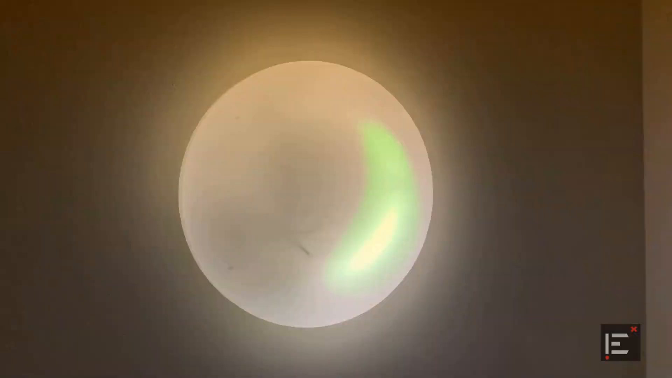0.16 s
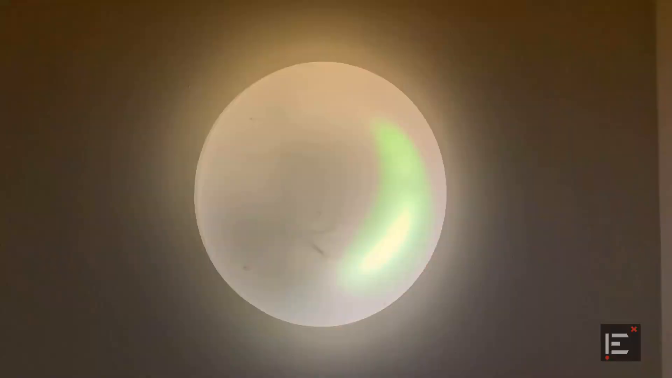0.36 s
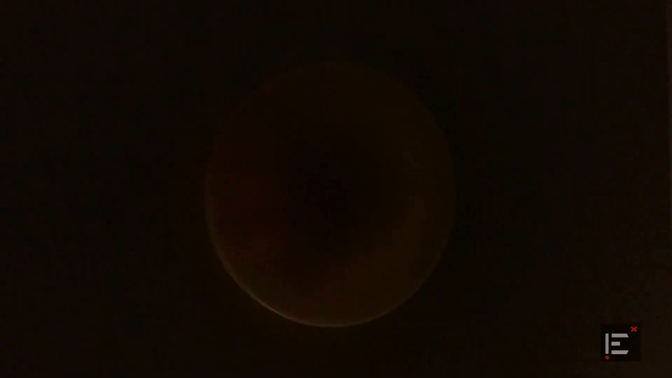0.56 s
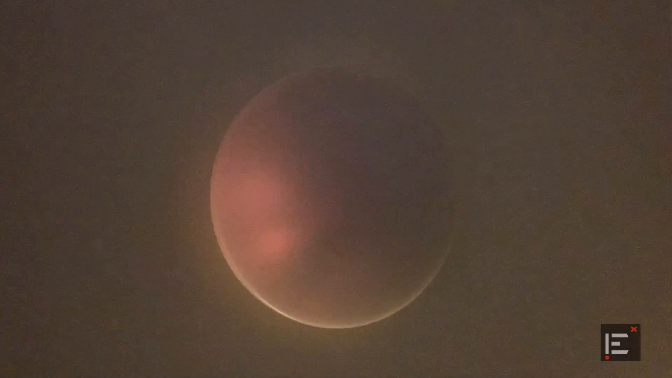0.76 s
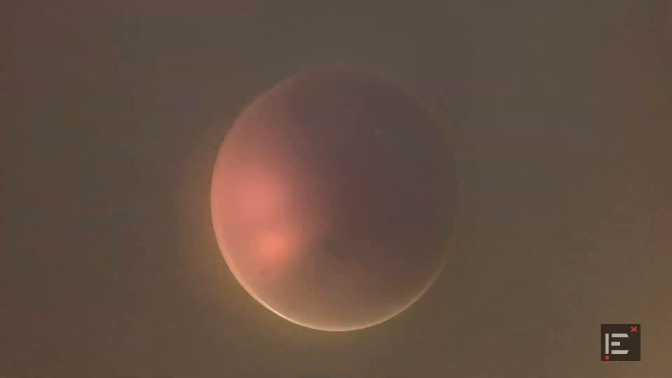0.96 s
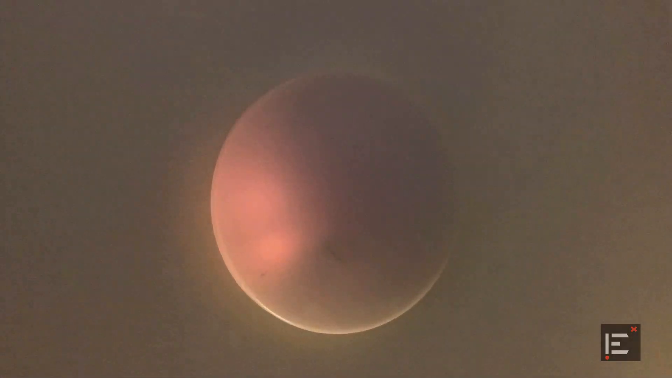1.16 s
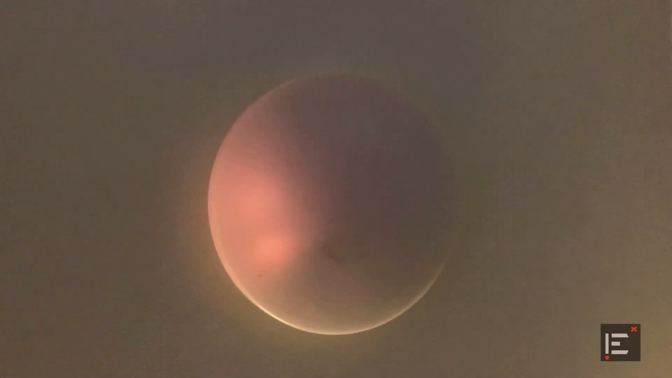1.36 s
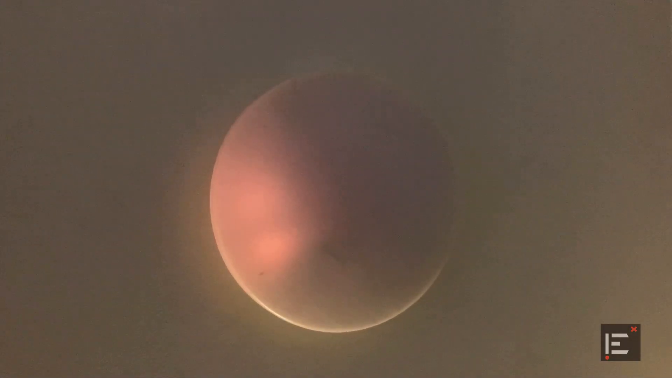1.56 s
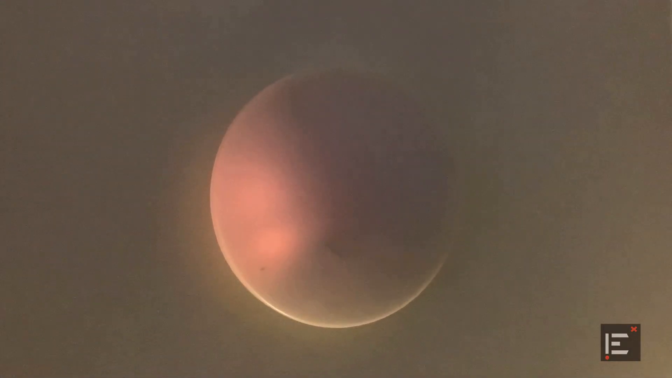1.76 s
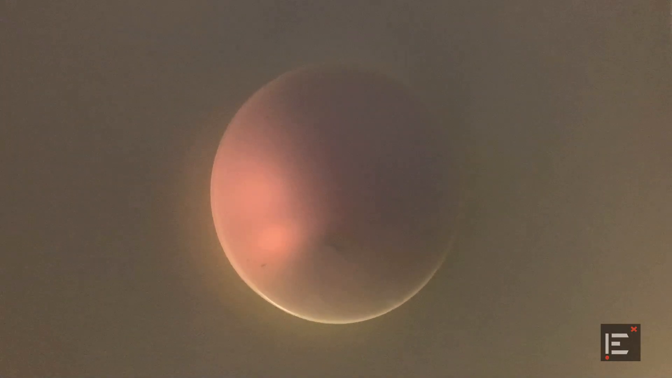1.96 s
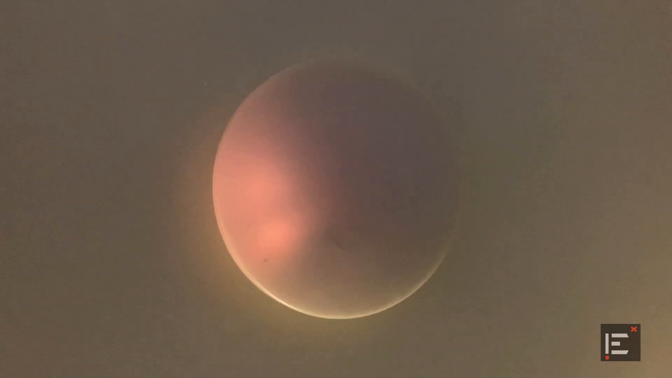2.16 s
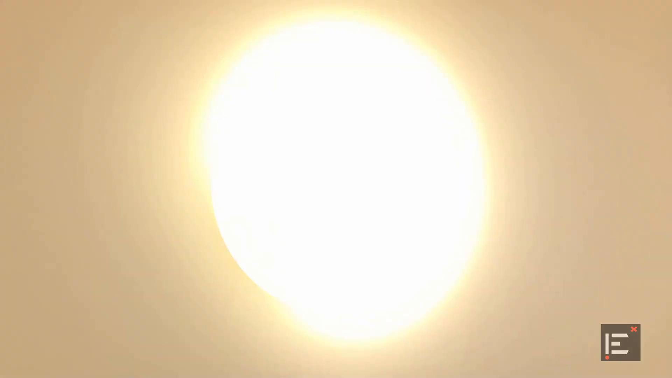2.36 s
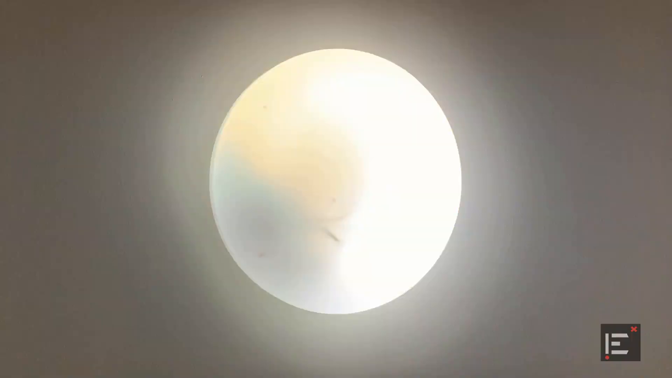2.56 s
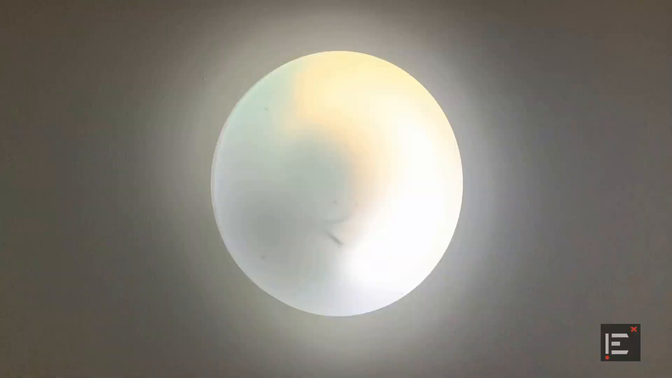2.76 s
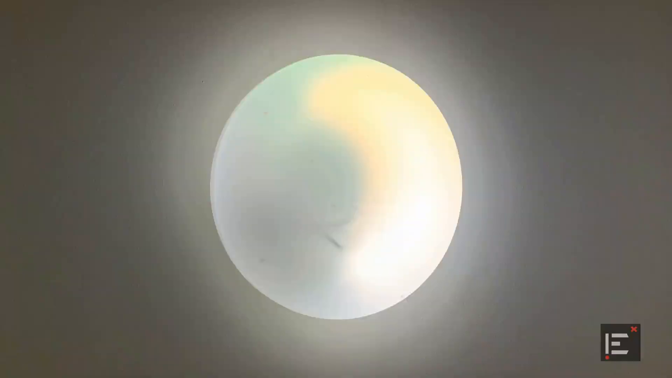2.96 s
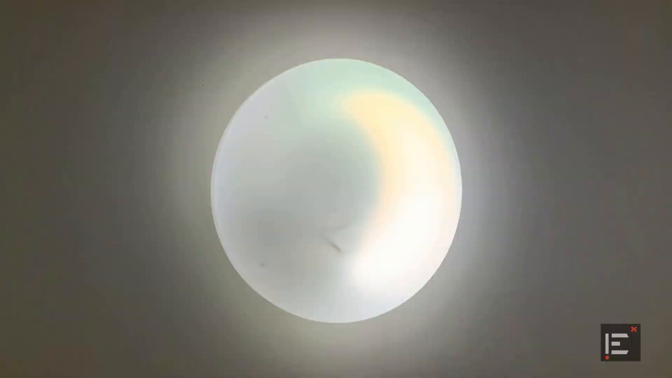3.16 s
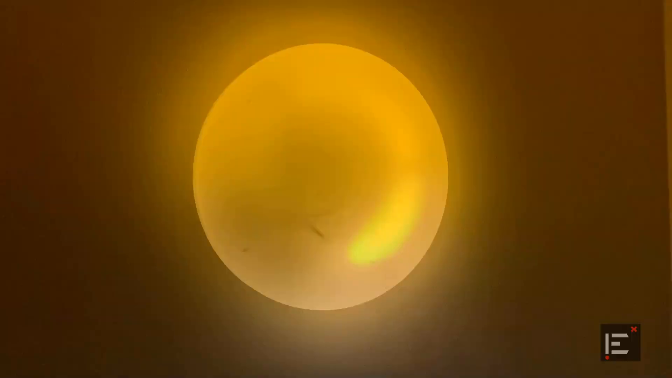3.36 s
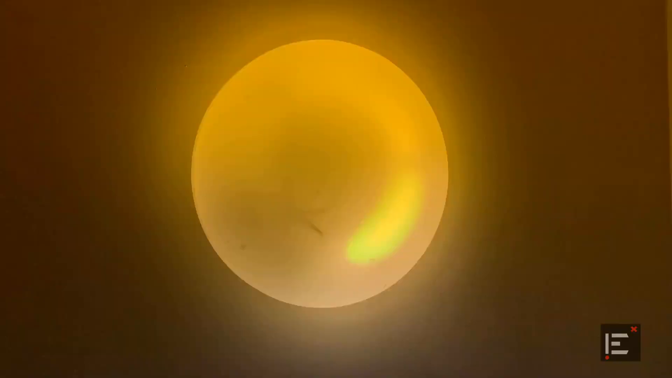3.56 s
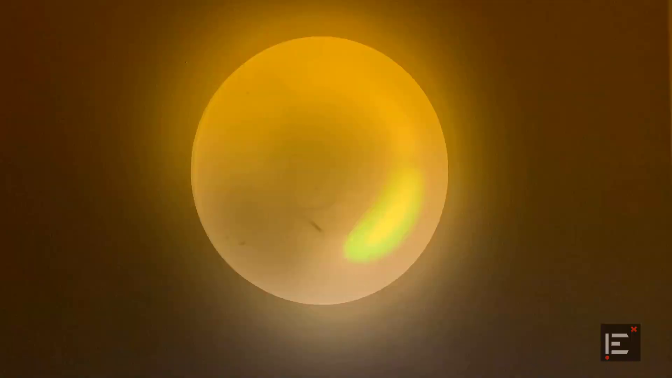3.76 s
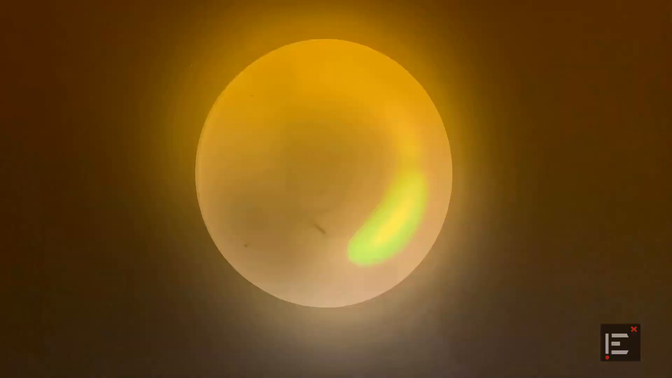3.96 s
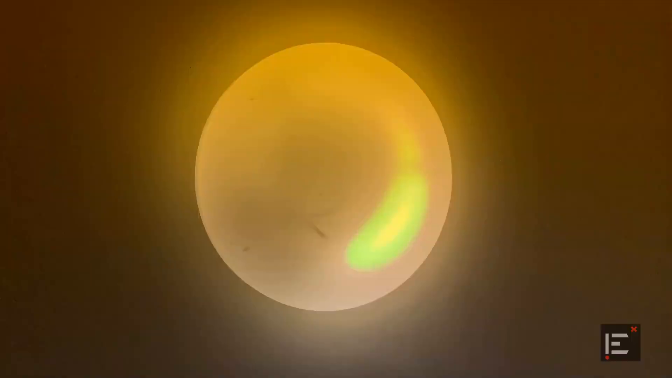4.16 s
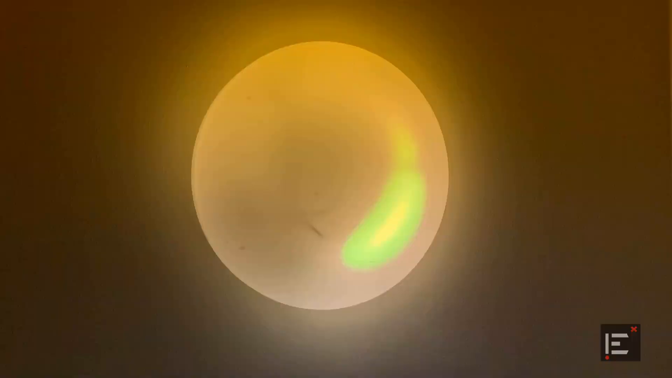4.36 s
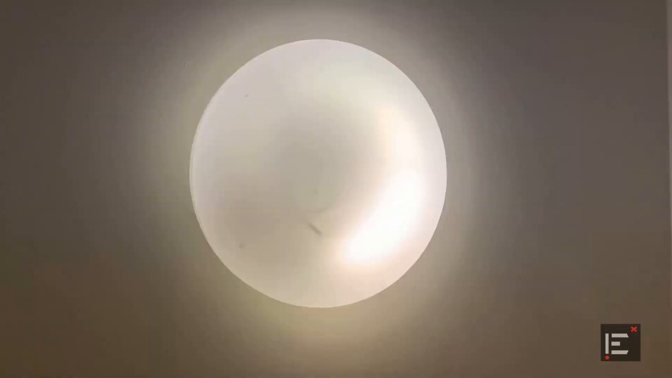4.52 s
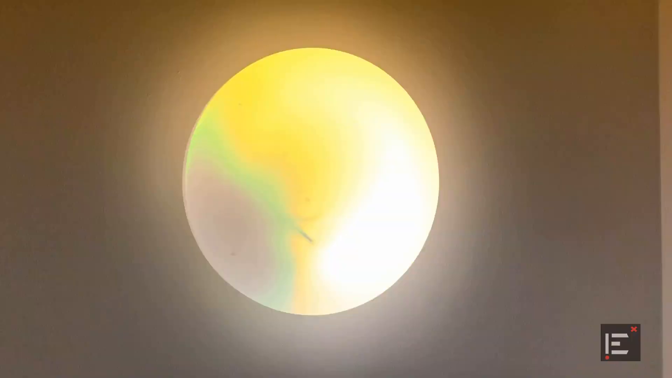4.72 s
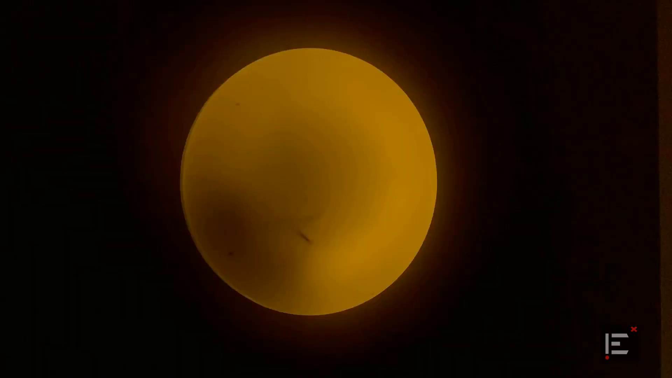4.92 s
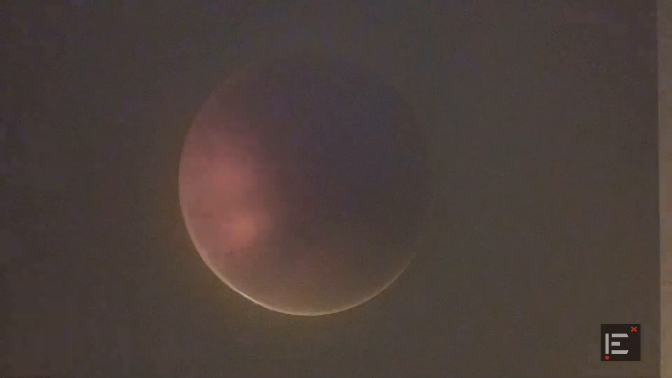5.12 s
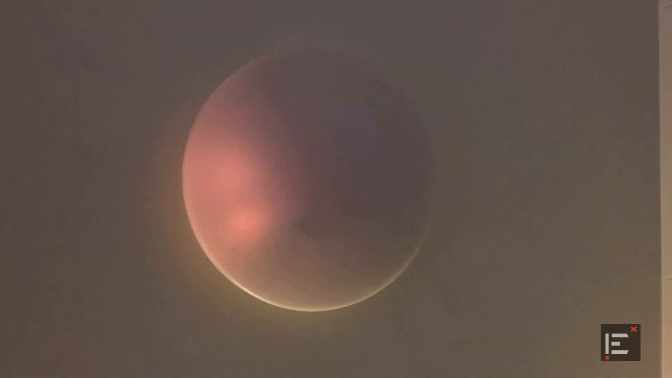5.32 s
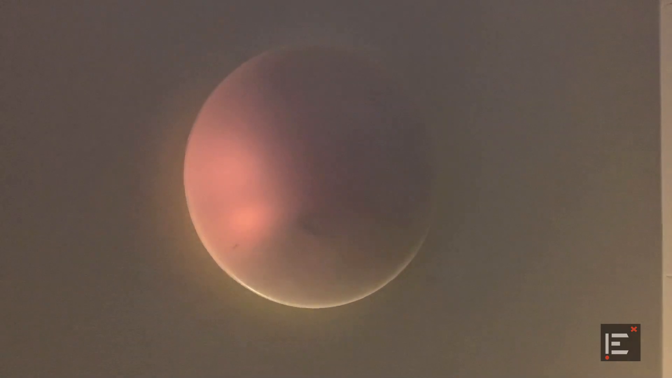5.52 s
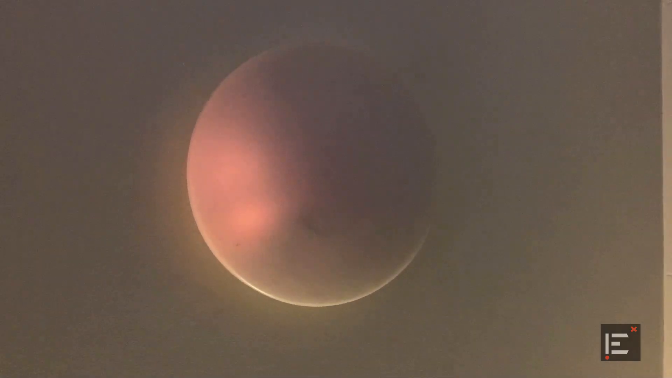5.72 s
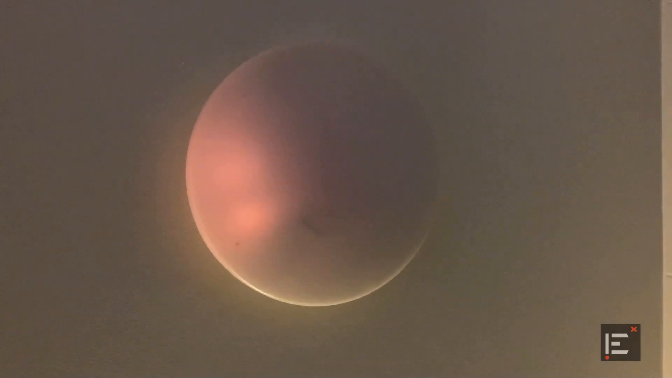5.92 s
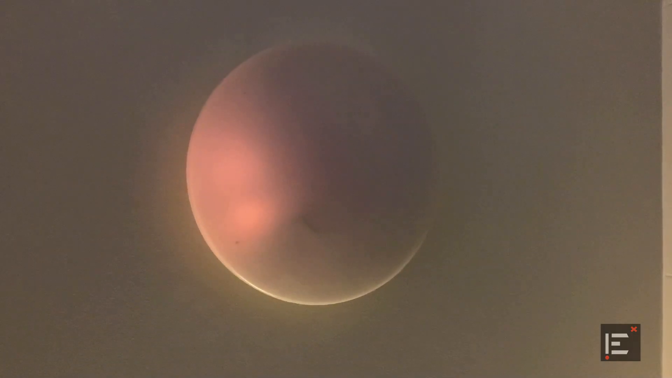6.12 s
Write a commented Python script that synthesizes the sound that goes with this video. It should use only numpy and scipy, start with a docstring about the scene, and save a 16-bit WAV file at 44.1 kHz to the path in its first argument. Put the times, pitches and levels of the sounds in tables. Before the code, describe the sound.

Close electrical mains buzz with a raspy fixture rattle switches instantly between loud and soft, five sudden changes, ending on the quiet hum.

```python
"""Close beside a failing fluorescent lamp, whose choke hums on multiples of the mains and rattles the fixture.
It starts loud with the tube lit, then jumps five times between this and a soft hum while only the ends glow.
After each jump the level settles within hundredths of a second, and the fine grain repeats at a fixed interval.
The hum sums partials that knock twice a mains cycle, over noise that throbs with them. When loud, patches of hum
and hiss swell and sink at random, mostly in the kilohertz range; when soft only the hiss's do, and each round dips briefly."""
import sys
import numpy as np
from scipy import signal
from scipy.fft import rfft, irfft
from scipy.io import wavfile
from scipy.ndimage import uniform_filter1d

SR = 44100
rng = np.random.default_rng(int(sys.argv[2]) if len(sys.argv) > 2 else 0)


def master_out(mix):
    """Clip the mix to full scale and print it as 16-bit PCM to the path in sys.argv[1]."""
    frames = np.transpose(np.atleast_2d(mix))
    ceiling = np.clip(frames, -1, 1)
    pcm = np.round(ceiling * 32767).astype(np.int16)
    wavfile.write(sys.argv[1], SR, pcm)


N = 277116

MAINS_HZ = 60
EDGE_HZ = 15640  # upper band edge of the sound
LIT, DIM = 1, 2  # level columns of the tables

# bands that the fixture radiates poorly: (centre [Hz], width [Hz], depth [dB])
HOLLOWS = [(95, 19, -4.5), (1910, 41, -5.5), (2496, 22, -14), (3193, 145, -14), (3823, 79, -21),
           (4480, 110, -4), (5170, 170, -8.5)]


def amp(db):
    """Amplitude factor of a level in dB."""
    return 10 ** (np.asarray(db) / 20)


def read(hz, points_hz, values):
    """Straight lines on a log-frequency axis."""
    return np.interp(np.log(hz + 1), np.log(np.asarray(points_hz) + 1), values)


def bells_db(hz, bells):
    """Sum of bell-shaped lifts or dips."""
    return sum(db * np.exp(-((hz - centre) / width) ** 2) for centre, width, db in bells)


def looping_noise(size, gain):
    """Noise that joins its own start; gain(hz) is the root of its power per Hz."""
    hz = np.fft.rfftfreq(size, 1 / SR)
    spectrum = rfft(rng.standard_normal(size)) * gain(hz)
    return irfft(spectrum * np.sqrt(SR / 2), size)


def swelling_patches(x, depth_db, from_hz, frames, bins):
    """Patches of the spectrum swell and sink at random, mostly above from_hz; the end still joins the start."""
    calm_hz = 5500  # above this the patches fade
    hop = SR // MAINS_HZ // 3
    # three rounds in a row, of which the middle one is kept
    hz, _, z = signal.stft(np.tile(x, 3), SR, nperseg=4 * hop, noverlap=3 * hop)
    patches = rng.standard_normal((len(x) // hop, len(hz))).T
    patches = uniform_filter1d(patches, frames, 1, mode="wrap")
    patches = uniform_filter1d(patches, bins, 0)
    onset = np.tanh((hz[:, None] / from_hz) ** 2)
    fade = 1 / np.hypot(1, (hz[:, None] / calm_hz) ** 2)
    gain = amp(depth_db * onset * fade * patches / patches.std())
    gain /= np.sqrt(np.mean(gain ** 2, axis=1, keepdims=True))  # mean power gain of 1 in each bin
    z *= gain[:, np.arange(z.shape[1]) % gain.shape[1]]
    _, rounds = signal.istft(z, SR, nperseg=4 * hop, noverlap=3 * hop)
    return rounds[len(x):2 * len(x)]


def throbbing_hiss(column, turns, knock_turn, gate):
    """Steady noise under the hum that swells a little with each knock, twice a mains cycle."""
    # noise spectrum before the hollows and the throb: (frequency [Hz], lit [dB per Hz], dim [dB per Hz])
    floor = np.transpose([(20, -80, -81), (60.4, -63, -70), (191, -71, -76.5), (513, -77, -84.5),
                          (930, -83.5, -94.5), (1620, -80, -88), (2180, -75.5, -83), (3040, -77.5, -94),
                          (3170, -83.5, -100), (4700, -89.5, -98.5), (5750, -92.5, -99), (8560, -100, -110),
                          (10100, -100, -110), (12400, -106, -118), (15000, -105, -114),
                          (15600, -108, -128)])
    throb = 1 + np.clip(gate, 0, 1) * np.cos(4 * np.pi * (turns - knock_turn))

    def gain(hz):
        return amp(read(hz, floor[0], floor[column]) + bells_db(hz, HOLLOWS))

    return throb * looping_noise(len(turns), gain)


def mains_turns(size):
    """Mains cycles passed at each sample; a slow waver in the knocks' timing blurs high partials most."""
    jitter_db, jitter_hz = -73, 7  # rms waver [dB of a turn], corner of its spectrum [Hz]
    wobble = looping_noise(size, lambda hz: (hz > 0) / (1 + (hz / jitter_hz) ** 2))
    return MAINS_HZ * np.arange(size) / SR + amp(jitter_db) * wobble / wobble.std()


def partial_levels(column, odd_db):
    """Strong partials of choke and fixture, and between them a fine buzz uneven from partial to partial."""
    # strongest partials: (multiple of mains, lit [dB], dim [dB])
    listed = np.transpose([(2, -31.8, -44.8), (3, -64.5, -58.9), (4, -26.2, -33.9), (5, -56.0, -51.4),
                           (6, -52.7, -59.6), (8, -43.2, -53.1), (10, -50.5, -60.0), (12, -56.5, -65.7),
                           (14, -51.6, -65.2), (16, -52.8, -67.9), (18, -57.3, -70.1), (21, -56.4, -58.6),
                           (24, -59.6, -69.0), (26, -51.3, -60.6), (27, -55.7, -58.1), (28, -49.5, -58.0),
                           (29, -56.5, -59.4), (30, -56.8, -69.0), (34, -55.3, -69.5), (35, -49.1, -54.9),
                           (36, -59.6, -65.2), (37, -47.4, -53.6), (38, -57.0, -64.2), (39, -44.6, -52.2),
                           (40, -52.3, -61.4), (41, -53.7, -63.3), (43, -50.6, -63.0), (44, -55.1, -63.0),
                           (47, -57.5, -83.2), (48, -53.8, -66.8), (49, -54.9, -70.7), (50, -57.2, -67.4),
                           (58, -54, -71), (68, -57, -69), (80, -66, -75), (81, -64, -71), (82, -64, -72)])
    # typical level of the other partials, before the changes below: (frequency [Hz], lit [dB], dim [dB])
    fizz = np.transpose([(60, -71, -86), (700, -69, -76.5), (2660, -62, -72), (2870, -79, -96),
                         (5080, -77.5, -88.5), (8600, -88.5, -97), (10200, -91.5, -96), (12700, -99, -107),
                         (13800, -95, -100), (15600, -106, -122)])
    # fixture resonances that lift the fine buzz: (centre [Hz], width [Hz], lift [dB])
    rings = [(4070, 154, 15), (4770, 150, 8.5), (5350, 49, 12), (8400, 60, 6), (13950, 200, 6)]
    uneven_db, standout = 7.5, 1.64  # spread of the fine buzz; the most that one stands out (spreads)

    fine = np.setdiff1d(np.arange(round(fizz[0][0] / MAINS_HZ), EDGE_HZ // MAINS_HZ), listed[0])
    fine_hz = fine * MAINS_HZ
    fine_db = read(fine_hz, fizz[0], fizz[column]) + odd_db * (fine % 2)
    fine_db += uneven_db * np.clip(rng.standard_normal(len(fine)), None, standout)
    fine_db += bells_db(fine_hz, rings) + bells_db(fine_hz, HOLLOWS)
    return np.r_[listed[0], fine], amp(np.r_[listed[column], fine_db])


def partial_phases(multiple, swell_turn, knock_turn, odd_turn):
    """The core knocks twice a cycle; the fixture scatters and delays its partials (phases in turns)."""
    # how far fixture resonances scatter the partials from the knock: (frequency [Hz], spread [turns])
    scatter = [(240, 0.03), (600, 0.21), (1200, 0.23), (1800, 0.57), (2100, 0.065), (2500, 0.15),
               (2900, 0.15), (3500, 0.43), (9000, 0.12), (15000, 0.15)]
    glide_from, glide_span = 35, 14  # multiples of mains over which the rattle band lags
    glide_turns = 0.006  # lag per squared multiple
    body_from_hz, body_to_hz, body_lag = 330, 870, .3  # band that the fixture body holds back, by turns

    hz = multiple * MAINS_HZ
    phase = -multiple * knock_turn
    phase += read(hz, *np.transpose(scatter)) * rng.standard_normal(len(multiple))
    # the top of the main rattle band arrives later, so each burst glides upward
    phase -= glide_turns * np.clip(multiple - glide_from, 0, glide_span) ** 2
    phase -= body_lag * ((hz > body_from_hz) & (hz < body_to_hz))
    # odd multiples tell one half cycle from the other
    phase += odd_turn * (multiple % 2)
    # the slow swelling of the core at twice the mains peaks between the knocks
    phase[multiple == 2] = -2 * swell_turn
    return phase


def choke_hum(column, turns, swell_turn, knock_turn, odd_turn, odd_db):
    """Sum of the mains multiples with which the choke drives the fixture."""
    multiple, level = partial_levels(column, odd_db)
    phase = partial_phases(multiple, swell_turn, knock_turn, odd_turn)
    waves = np.cos(2 * np.pi * (multiple[:, None] * turns + phase[:, None]))
    return np.sqrt(2) * level @ waves  # levels are rms


def lamp(column, cycles, swell_turn, knock_turn, odd_turn, odd_db, hum_patch_db, hiss_patch_db, gate):
    """One round of hum and hiss, a whole number of mains cycles long, so that it can repeat."""
    turns = mains_turns(cycles * SR // MAINS_HZ)
    hum = choke_hum(column, turns, swell_turn, knock_turn, odd_turn, odd_db)
    hiss = throbbing_hiss(column, turns, knock_turn, gate)
    hum = swelling_patches(hum, hum_patch_db, from_hz=2500, frames=9, bins=2)
    hiss = swelling_patches(hiss, hiss_patch_db, from_hz=1300, frames=8, bins=3)
    return hum + hiss


def dipping(x, dip_s, dip_db, width_s):
    """The level dips briefly once a round, along a bell in time."""
    t = np.arange(len(x)) / SR
    away = (t - dip_s + t[-1] / 2) % t[-1] - t[-1] / 2
    return x * amp(dip_db * np.exp(-(away / width_s) ** 2))


def scene():
    """Lit and dim stretches follow each other with abrupt changes."""
    # moments when the tube drops out or strikes, in turn, starting lit:
    # (time [s], level just after against the settled level [dB])
    switches = [(0.689, 2.5), (2.348, -1), (3.056, 2.5), (3.315, -0.2), (4.982, 1)]
    # where the grain pattern of each stretch is counted from: (start [mains cycles])
    pattern_start = [0, 0, 142, 142, 200, 242]
    switch_s, settle_s = 0.00052, 0.011  # length of a changeover, time constant of settling

    # swell_turn and knock_turn are moments in the mains cycle (turns)
    # when lit, odd multiples shift half a turn: the other half cycle knocks harder
    lit = lamp(LIT, cycles=42, swell_turn=.22, knock_turn=-.016, odd_turn=.5, odd_db=-5.5,
               hum_patch_db=0.84, hiss_patch_db=2.5, gate=0.22)
    dim = lamp(DIM, cycles=14, swell_turn=.195, knock_turn=-.0103, odd_turn=0, odd_db=-1.2,
               hum_patch_db=0.0, hiss_patch_db=5.0, gate=0.18)
    states = [lit, dipping(dim, dip_s=0.167, dip_db=-1.1, width_s=0.015)]

    n, out = np.arange(N), np.zeros(N)
    # bounds before the start and after the end close the first and last stretch
    times, held_db = np.transpose([(-1, 0), *switches, (N, 0)])
    edges = [np.clip((n / SR - s) / switch_s + .5, 0, 1) for s in times]
    for k, start in enumerate(pattern_start):
        sound = states[k % 2]
        repeated = sound[(n - start * SR // MAINS_HZ) % len(sound)]
        settling = amp(held_db[k] * np.exp(-np.abs(n / SR - times[k]) / settle_s))
        out += (edges[k] - edges[k + 1]) * settling * repeated
    return out[None]


def record(dry):
    """The band limit of the recorder behind the microphone: a steep low-pass."""
    lowpass = signal.firwin(1023, EDGE_HZ, window=("kaiser", 9), fs=SR)
    return signal.oaconvolve(dry, lowpass[None], "same")


dry = scene()
out = record(dry)
master_out(out)
```